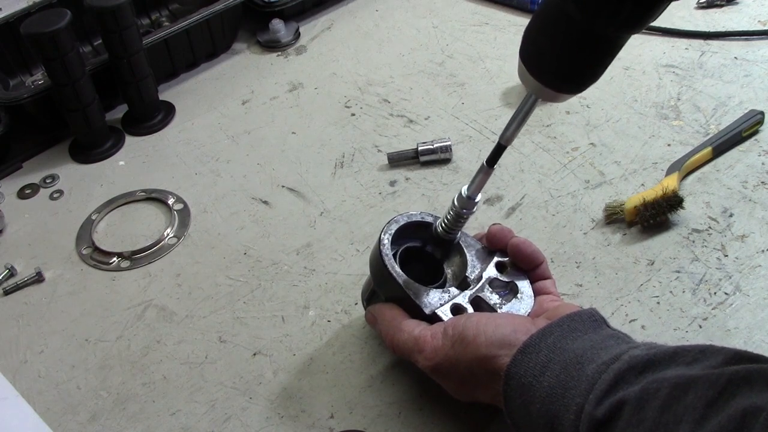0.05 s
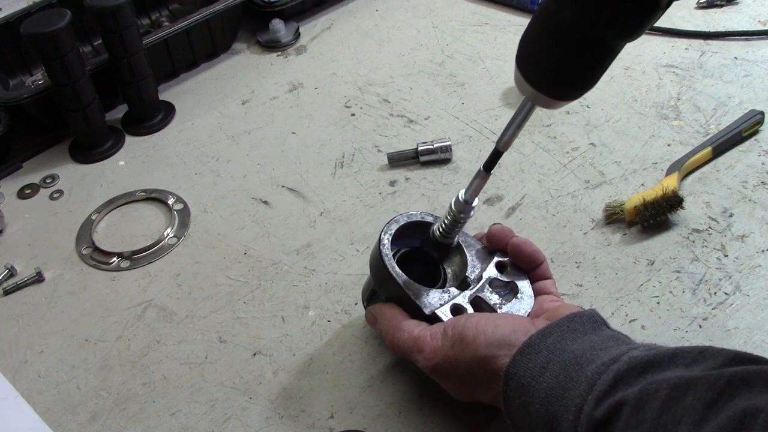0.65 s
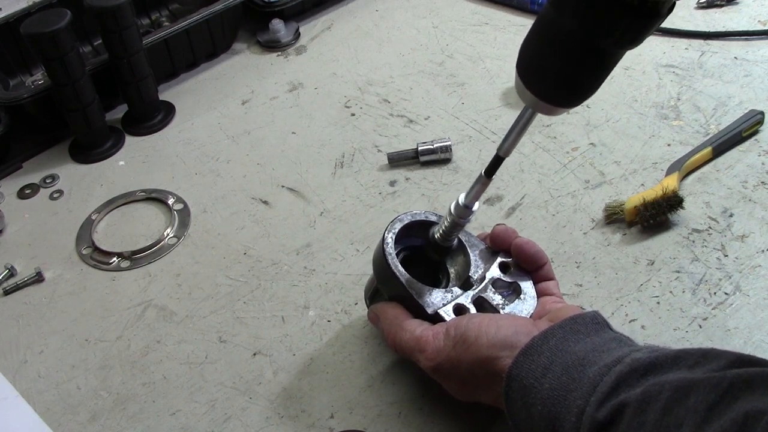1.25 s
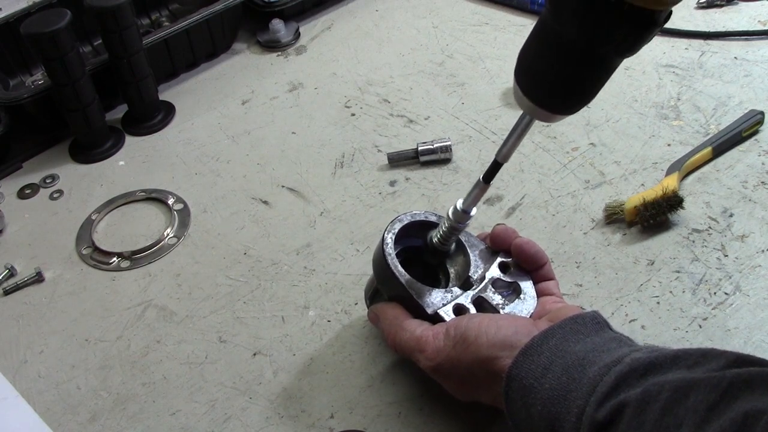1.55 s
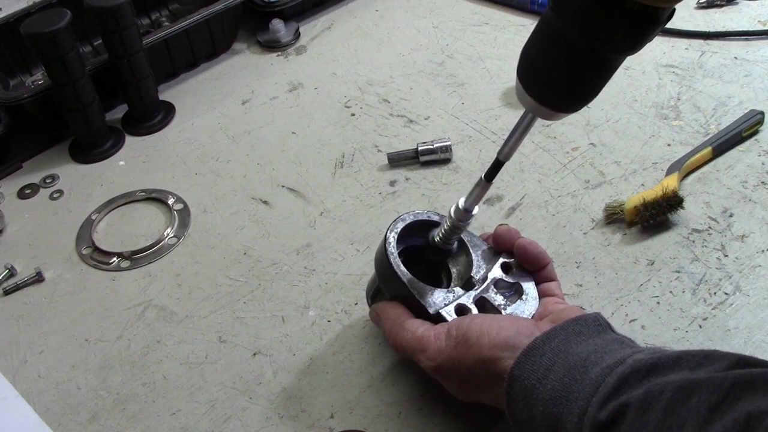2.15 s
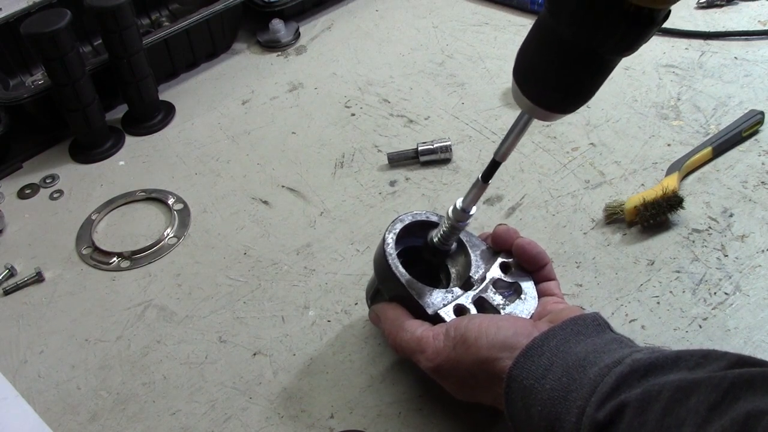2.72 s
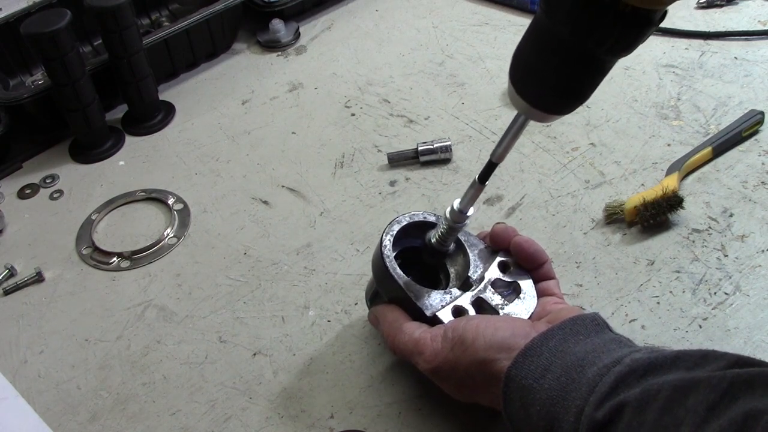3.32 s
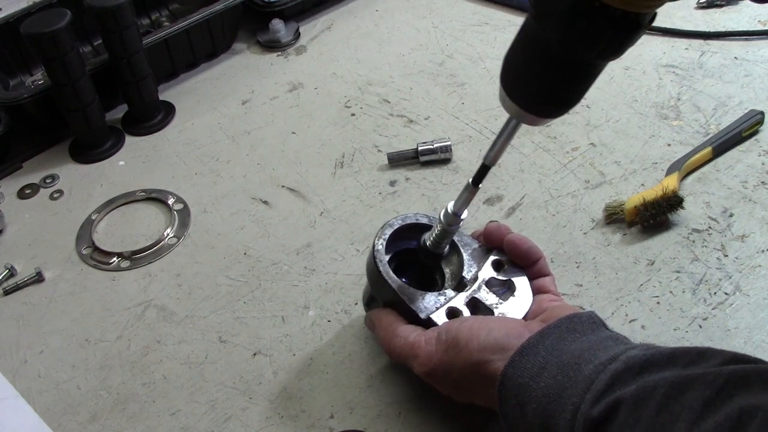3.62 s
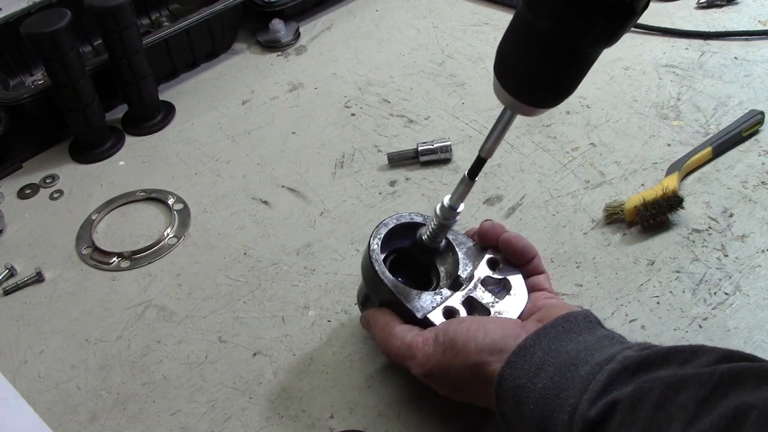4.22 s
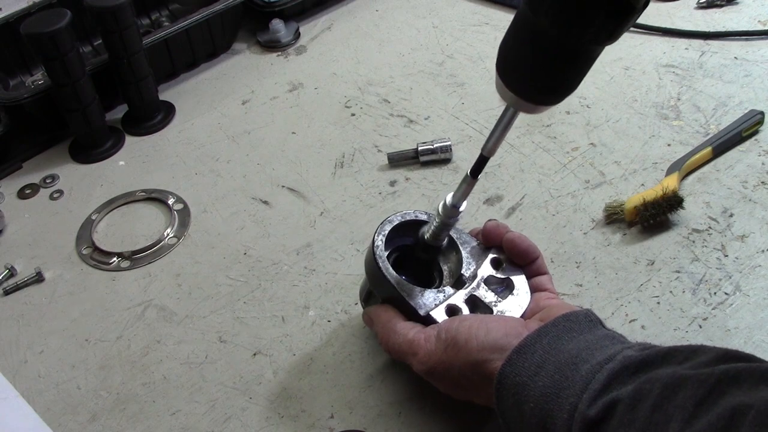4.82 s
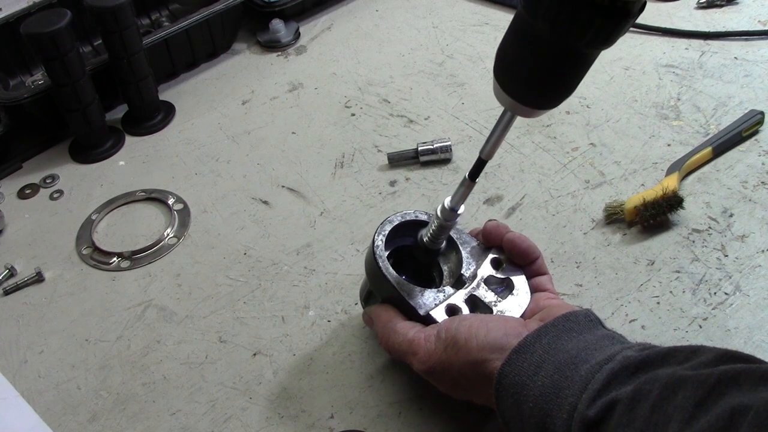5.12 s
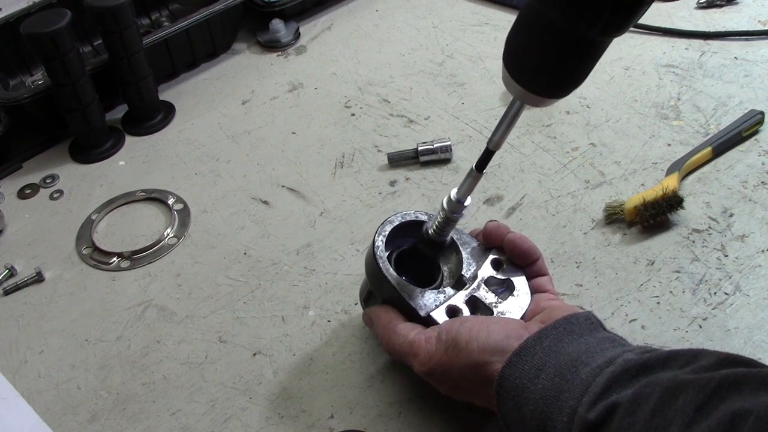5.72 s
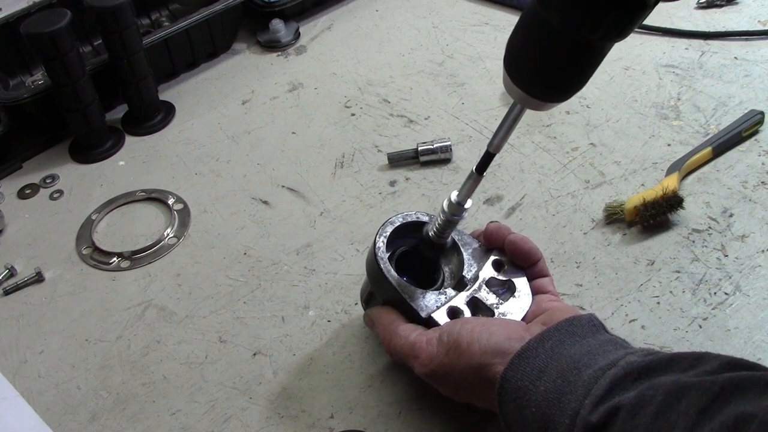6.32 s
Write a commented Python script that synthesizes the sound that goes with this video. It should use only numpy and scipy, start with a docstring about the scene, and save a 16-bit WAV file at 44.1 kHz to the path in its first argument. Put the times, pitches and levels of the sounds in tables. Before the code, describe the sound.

Close to the microphone at a workbench, a cordless drill spins a small hone inside a metal brake caliper. It starts with a slow motor whirr and a thin, steady high tone. After a second the gears clatter briefly and the drill winds up to full speed. Motor and gears then whine over the gritty rasp of the stones, dipping slightly about once a second.

```python
"""First a slow motor whirr and the fixed-pitch song of a speed controller: a cordless drill at half trigger.
Close to the microphone, at a workbench, it spins a small hone in the bore of a hand-held brake caliper.
After one second the trigger is pulled fully, the gears clatter and the drill winds up to full speed.
Motor and gears then whine over the rasp of the stones, sagging briefly about once a second."""
import sys
import numpy as np
from scipy import signal
from scipy.fft import rfft, irfft
from scipy.io import wavfile

SR = 44100
rng = np.random.default_rng(int(sys.argv[2]) if len(sys.argv) > 2 else 0)


def master_out(mix):
    """Clip the mix to full scale and print it as 16-bit PCM to the path in sys.argv[1]."""
    frames = np.transpose(np.atleast_2d(mix))
    ceiling = np.clip(frames, -1, 1)
    pcm = np.round(ceiling * 32767).astype(np.int16)
    wavfile.write(sys.argv[1], SR, pcm)


N = 289296
TIME, BINS = np.arange(N) / SR, np.fft.rfftfreq(N, 1 / SR)
SLOW_STEP = 32  # samples between the points of a slow random curve
SLOW_HZ = np.fft.rfftfreq(16384, SLOW_STEP / SR)
SQUEEZE_S = 1.005  # the trigger goes from half to full

# How alike the noise is in the left and right channels. Each row: frequency in Hz, correlation 0 to 1.
STEREO_LIKENESS = [(25, .8), (60, .3), (130, .6), (300, .96), (850, .985), (1350, 1), (1550, 1),
                   (1750, .975), (2100, 1), (2750, .99), (4000, .995), (5200, .93), (6700, .97),
                   (8300, .91), (11000, .98), (15000, .965)]
# Balance at the microphone. Each row: frequency in Hz, left minus right in dB.
PORT_BALANCE = [(60, -.7), (330, -2.1), (650, -1.3), (1150, 0), (3900, 0), (4250, -.7), (4600, -.2),
                (7500, -.2), (8800, -.8), (10500, 0)]
# Motor speed at half trigger. Each row: time in seconds, turns a second.
SPEED_AT_HALF = [(0, 202.9), (.6, 199.5), (.66, 198.4), (1, 198.5)]
# Full speed, drifting with the pressure of the hand. Each row: time in seconds, turns a second.
SPEED_AT_FULL = [(1.5, 354.4), (2.25, 354.8), (2.4, 355.6), (2.55, 354.6), (3.3, 354.9), (3.5, 354.4),
                 (4.25, 354.7), (5.15, 353.4), (5.4, 354.4), (6, 353), (6.2, 353.6), (6.5, 351.9)]
# Colour of the stones' rasp. Each row: frequency in Hz, gain in dB at half and at full trigger.
RASP_COLOUR = [(60, -34.4, -36.2), (100, -27.4, -27.5), (160, -16.5, -23.6), (260, -13.9, -14.8),
               (620, -9.5, -6.1), (1050, -9.4, -7.7), (1650, -4.2, -1.2), (2150, -6.3, -3.1),
               (3100, -1.8, -1.0), (3750, -3.3, -1.3), (4500, -0.5, 1.1), (5100, 1.4, -1.2),
               (6300, -7.3, -6.5), (8200, -2.5, -5.4), (9200, -6.4, -7.4), (10200, -4.9, -6.9),
               (12500, -7.9, -9.8), (14300, -7.9, -10.2), (15700, -9.4, -11.1)]
# Resonances of housing and bore. Each row: centre in Hz, width in Hz, lift in dB.
BODY_RESONANCES = [(1847, 62, 3.5), (2150, 47, 1.5), (2590, 150, 3), (2820, 98, 0.5), (3280, 100, 2.5),
                   (5080, 70, 1.5), (5330, 100, 2.5), (7430, 230, 2.5), (8130, 160, 2), (8530, 170, 5),
                   (9970, 180, 3.5)]
# The hollow ring. Each row: centre in Hz, half-width in Hz, relative level in dB.
HOLLOW_MODES = [(1262, 76, -10.5), (1342, 38, -3), (1408, 41, -2.5)]
# Shaft and gears pulse the rasp. Each row: order (multiple of the motor speed), depth from 0 to 1.
RASP_PULSES = [(.0909, .05), (.873, .06), (1, .09), (1.0909, .08), (2, .06), (3, .04)]
# Tones that swell under the torque of the run-up. Each row: order, peak time in seconds, peak in dB.
STRAIN_TONES = [(1, 1.07, -39.5), (2, 1.116, -34), (5, 1.075, -29), (14.1, 1.06, -26), (20, 1.09, -29),
                (30, 1.105, -27.5), (35, 1.085, -24)]
# Buzz of the five-slot armature at half trigger. Each row: order, level in dB.
ARMATURE_TONES = [(40, -34), (50, -37), (50.4, -39), (54, -39), (55, -46), (60, -40), (65, -43), (70, -43)]
# Weaker motor and gear tones. Each row: order, base level in dB at half and at full trigger.
WEAK_TONES = [(0.811, -57, -54), (1, -49, -43), (2, -55, -45), (2.746, -42.5, -59), (5.01, -53, -49),
              (8.13, -49, -40.5), (10.96, -53, -43), (13.1, -34, -32.7), (14.1, -28.5, -46), (15, -41, -48),
              (23.1, -48, -47), (24.1, -39, -41), (25, -37, -35.7), (25.35, -32, -50), (31, -43, -34),
              (32, -51, -37), (34.9, -35, -43)]
# The four strong whines. Each row: order (rounded in use), base level in dB at half and at full trigger,
# swell time in seconds, dB added by load, dB lost in a sag, sway in dB, share of drift and stutter.
STRONG_WHINES = [(10, -49, -27.8, .27, 0.5, 0, .9, -.6), (12, -23.2, -18.3, .02, 3.9, 2.7, .75, .07),
                 (19.97, -36, -28.3, .26, 0.5, 1, 1, .8), (30, -29.5, -18.3, .23, 0, 3.5, 1, 1.1)]
# All four whines grow at half trigger. Each row: time in seconds, gain in dB.
WHINE_RISE = [(0, -7), (.25, -8.5), (.45, -3.5), (.57, -7), (.69, -0.5)]
# Drift of the high whines; the lowest grows as they fade. Each row: time in seconds, gain in dB.
WHINE_DRIFT = [(1.35, -1.5), (1.52, 1), (1.68, 0), (2.2, .5), (3.35, .3), (3.85, -1.5), (4.25, -0.36),
               (5.05, -4), (5.35, -2), (6.25, -2), (6.5, -4)]


def gain_of(db):
    """Decibels to gain."""
    return 10 ** (np.asarray(db) / 20)


def unit_rms(x):
    """Scales to rms 1."""
    return x / np.sqrt(np.mean(x ** 2) + 1e-20)


def curve(rows):
    """A table of times and values, sample by sample."""
    return np.interp(TIME, *np.transpose(rows))


def spectra(rows):
    """Each column of a table of frequencies, bin by bin."""
    hz, *columns = np.transpose(rows)
    return [np.interp(np.log(BINS + 1), np.log(hz), column) for column in columns]


def coloured(x, gain):
    """Filters by a gain for each bin."""
    return irfft(rfft(x) * gain, N)


def slow_noise(gain):
    """Slow noise of rms 1 with the given gain at each rate of change."""
    slow = irfft(gain * rfft(rng.standard_normal(2 * len(SLOW_HZ) - 2)))
    return unit_rms(np.interp(np.arange(N) / SLOW_STEP, np.arange(len(slow)), slow))


def wander(hz):
    """Random drift at rates up to about hz."""
    return slow_noise(1 / (1 + (SLOW_HZ / hz) ** 2))


def sway(hz, octaves=.6):
    """Uneven swinging at about hz."""
    return slow_noise(np.exp(-.5 * (np.log2(SLOW_HZ / hz + 1e-9) / octaves) ** 2))


def swell(peak_s, width_s):
    """A bell curve in time."""
    return np.exp(-.5 * ((TIME - peak_s) / width_s) ** 2)


def since(start_s):
    """Seconds since start_s, 0 before it."""
    return np.maximum(TIME - start_s, 0)


def trigger(rise_s):
    """0 at half trigger, rising to 1 within rise_s of the squeeze."""
    return np.minimum(since(SQUEEZE_S) / rise_s, 1)


def load(peak_after_s=.19):
    """Extra load of the run-up: rises to 1 after the squeeze and dies away."""
    age = since(SQUEEZE_S) / peak_after_s
    return age * np.exp(1 - age)


def sag(first_s=1.7, every_s=1.044, grip_s=.025, recover_s=.055):
    """Regular brief drag at full speed, 0 to 1: grips quickly and lets go slowly."""
    age = since(first_s - grip_s) % every_s
    return np.minimum(age / grip_s, np.exp((grip_s - age) / recover_s))


def speed(wind_up_s=.997, rush_s=.042, creep_s=.11, creep_share=.26, sag_hz=3, jitter_hz=.22):
    """Motor turns a second: slow, then a quick rush and a creep up to full speed, with regular sags."""
    age = since(wind_up_s)
    slow = (1 - creep_share) * np.exp(-age / rush_s) + creep_share * np.exp(-age / creep_s)
    base_hz = slow * curve(SPEED_AT_HALF) + (1 - slow) * curve(SPEED_AT_FULL)
    return base_hz - sag_hz * sag() + jitter_hz * wander(10)


def shaft_angle(judder_turns=.009, judder_s=.12):
    """The shaft angle in turns; it judders as the sudden torque throws the gears across their play."""
    kick = trigger(.005) * np.exp(-since(SQUEEZE_S) / judder_s)
    return np.cumsum(speed()) / SR + judder_turns * kick * wander(120)


def tone(order, turns, shake, shake_hz=45):
    """A tone of rms 1 with order cycles to the turn, shaken in level and phase."""
    angle = 2 * np.pi * (order * turns + rng.random())
    shaken = (1 + shake * wander(shake_hz)) * np.cos(angle) + shake * wander(shake_hz) * np.sin(angle)
    return np.sqrt(2 / (1 + 2 * shake ** 2)) * shaken


def noise_pair():
    """White noise, nearly the same in the left and right channels above the bass."""
    likeness = np.clip(spectra(STEREO_LIKENESS)[0], 0, .9995)
    mid = coloured(rng.standard_normal(N), np.sqrt((1 + likeness) / 2))
    side = coloured(rng.standard_normal(N), np.sqrt((1 - likeness) / 2))
    return np.array([mid + side, mid - side])


def rumble(half_db=-59.5, full_db=-70, bump_db=-52, corner_hz=42, fade_s=.5):
    """A faint rumble in the background that fades after the squeeze, with one soft bump."""
    level = gain_of(half_db + (full_db - half_db) * trigger(fade_s))
    bump = gain_of(bump_db) * swell(peak_s=4.08, width_s=.02)
    return (level + bump) * unit_rms(coloured(noise_pair(), 1 / (1 + (BINS / corner_hz) ** 8)))


def bench_echoes(x, echo_db=-13, latest_s=.012, count=10):
    """Short echoes off the nearby bench, hand and tools ripple the colour."""
    delays, signs = rng.uniform(.001, latest_s, count), rng.choice([-1, 1], count)
    taps = np.bincount((delays * SR).astype(int), signs, N)
    return coloured(x, 1 + gain_of(echo_db) * rfft(taps) / np.sqrt(count))


def hollow_ring(pulsing, half_db=-33, full_db=-30.2, load_db=3, sway_db=1.3, knock_db=7):
    """A hollow ring under the rasp; it jumps as the squeeze knocks the hone against the bore."""
    ring = sum(coloured(noise_pair(), gain_of(db) / (1 + 1j * (BINS - hz) / half_width) ** 2)
               for hz, half_width, db in HOLLOW_MODES)
    level_db = half_db + (full_db - half_db) * trigger(.02) + load_db * load() + sway_db * sway(6)
    level_db += knock_db * swell(peak_s=1.036, width_s=.015)
    return gain_of(level_db) * unit_rms(ring * pulsing)


def gear_strain(turns, width_s=.03, shake=.35):
    """Loaded gears growl and squeal upward for a moment."""
    return sum(gain_of(db) * swell(peak_s, width_s) * tone(order, turns, shake)
               for order, peak_s, db in STRAIN_TONES)


def gear_clatter(level_db=-14.5, rise_s=.025, fade_s=.17, centre_hz=2700, octaves=2.1, flutter=.23):
    """The gears clatter as the sudden torque takes up their play."""
    band = np.exp(-.5 * (np.log2((BINS + 1) / centre_hz) / octaves) ** 2)
    envelope = trigger(rise_s) * np.exp(-since(SQUEEZE_S) / fade_s)
    rattle = noise_pair() * (1 + flutter * wander(150))
    return gain_of(level_db) * envelope * unit_rms(coloured(rattle, band))


def motor_whirr(turns, shaft_shake=.23, gear_shake=.5, start_db=1.5, fade_db_per_s=3, load_db=2.5):
    """Weaker tones, shaken by play in the gears: they fade at half trigger and grow under load."""
    full, whirr = trigger(.083), 0
    shared_db = (1 - full) * (start_db - fade_db_per_s * TIME) + load_db * load()
    for order, half_db, full_db in WEAK_TONES:
        rough = order > 3 and abs(order - round(order)) > .05  # gear tones between whole orders
        db = (1 - full) * half_db + full * full_db + shared_db
        whirr += gain_of(db) * tone(order, turns, gear_shake if rough else shaft_shake, shake_hz=57)
    return whirr


def armature_buzz(turns, shake=.083):
    """The slotted armature buzzes until the squeeze."""
    return (1 - trigger(.01)) * sum(gain_of(db) * tone(k, turns, shake) for k, db in ARMATURE_TONES)


def controller_song(chop_hz=3921.3, level_db=-18.5, third_db=-24, shake=.051):
    """Chopped current makes the windings sing until full trigger bypasses the chopper."""
    cycles = chop_hz * TIME
    song = tone(1, cycles, shake) + gain_of(third_db) * tone(3, cycles, shake)
    return gain_of(level_db) * (1 - trigger(.006)) * song


def hone_rasp(turns, half_db=-12.3, full_db=-12.9, load_db=2, grit_db=-11, grit_per_s=1200):
    """Rubbing stones and grit, pulsed by the turning parts, sound through housing and bore."""
    grit = (rng.random(N) < grit_per_s / SR) * rng.choice([-1, 1], N)
    grit = grit * gain_of(2.5 * np.minimum(rng.exponential(1, N), 5))  # a few grains stand out
    pulsing = 1 + sum(depth * np.cos(2 * np.pi * (k * turns + rng.random())) for k, depth in RASP_PULSES)
    rubbing = noise_pair() + gain_of(grit_db) * unit_rms(grit)
    drive = unit_rms(bench_echoes(rubbing * pulsing))
    body_db = sum(db / (1 + (2 * (BINS - hz) / width) ** 2) for hz, width, db in BODY_RESONANCES)
    slow, fast = (coloured(drive, gain_of(db + body_db)) for db in spectra(RASP_COLOUR))
    full = trigger(.17)
    rasp = (1 - full) * gain_of(half_db) * slow + full * gain_of(full_db) * fast
    return gain_of(load_db * load()) * rasp + hollow_ring(pulsing)


def drill_whines(turns, shake=.08, sway_hz=2.9, stutter_db=3.5, stutter_hz=22):
    """Motor and gears whine up close: they swell with the squeeze, stutter under load, sag and sway."""
    chatter = .25 * swell(peak_s=1.02, width_s=.035)
    rise_db, drift_db = curve(WHINE_RISE), curve(WHINE_DRIFT)
    unsettled = trigger(.05) * (1 - trigger(.3) ** 2)
    whines = 0
    for order, half_db, full_db, swell_s, load_db, sag_db, sway_db, share in STRONG_WHINES:
        db = half_db + (full_db - half_db) * trigger(swell_s) ** 2 + rise_db
        db += load_db * load() - sag_db * sag() + sway_db * sway(sway_hz)
        db += share * (drift_db + stutter_db * unsettled * sway(stutter_hz))
        whines += gain_of(db) * tone(round(order), turns, shake + chatter, shake_hz=64)
    return whines


def scene():
    """Drill and hone in front, on one shaft angle, with the rumble behind."""
    turns = shaft_angle()
    drill = drill_whines(turns) + motor_whirr(turns) + armature_buzz(turns) + gear_strain(turns)
    return drill + controller_song() + hone_rasp(turns) + gear_clatter() + rumble()


def record(dry, lag_s=1.3e-6, top_hz=15780):
    """The microphone's left port hears the drill a shade softer and later; the treble ends at top_hz."""
    side = np.array([[.5], [-.5]])  # left, right
    balance = gain_of(side * spectra(PORT_BALANCE)[0])
    delay = np.exp(-2j * np.pi * side * BINS * lag_s)
    lowpass = signal.firwin(1023, top_hz, window=("kaiser", 9), fs=SR)
    return signal.oaconvolve(coloured(dry, balance * delay), lowpass[None], "same")


dry = scene()
out = record(dry)
master_out(out)
```